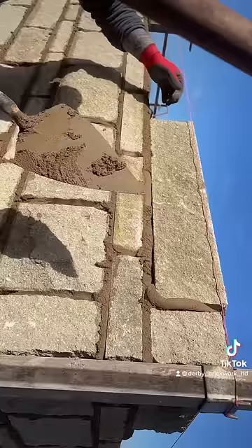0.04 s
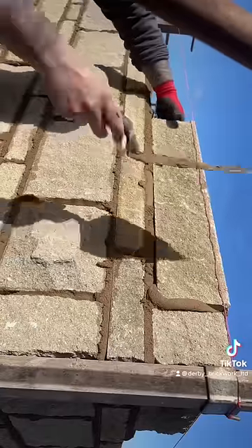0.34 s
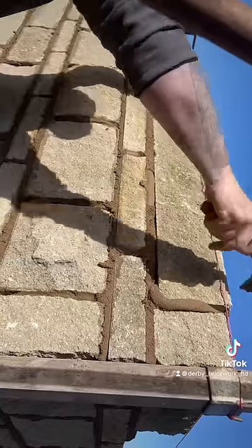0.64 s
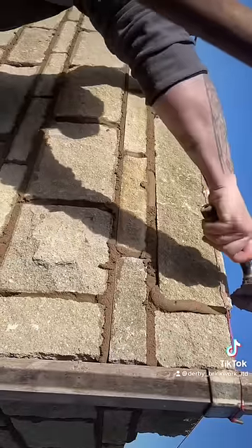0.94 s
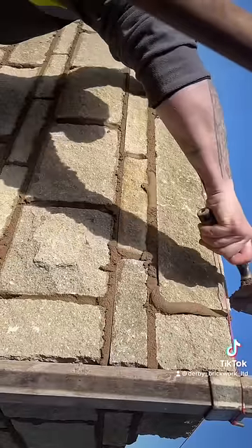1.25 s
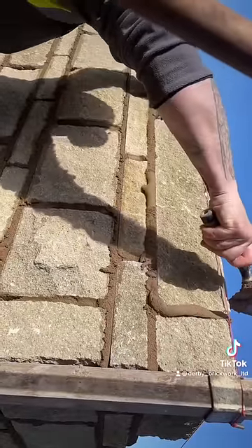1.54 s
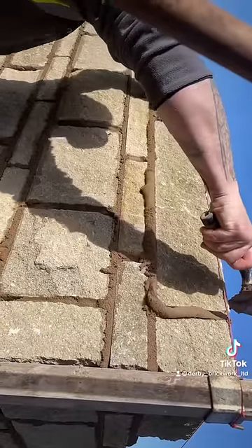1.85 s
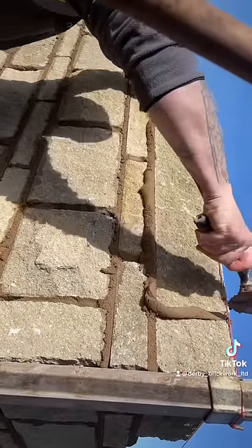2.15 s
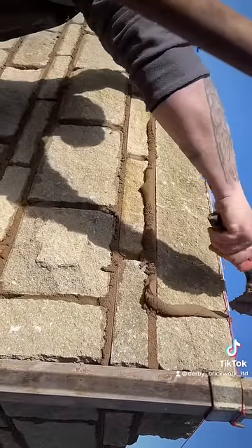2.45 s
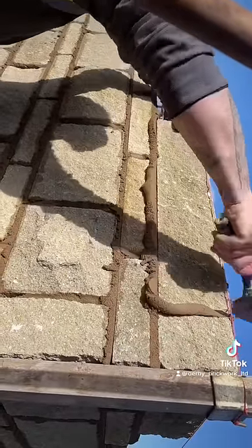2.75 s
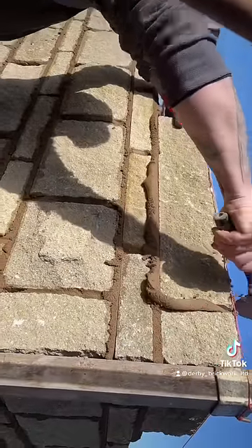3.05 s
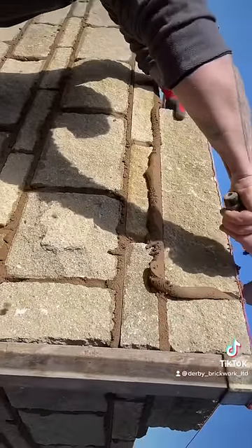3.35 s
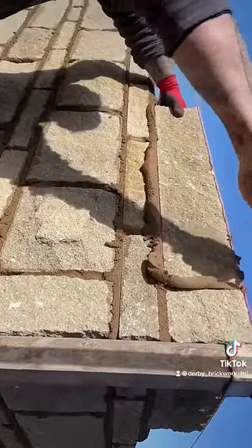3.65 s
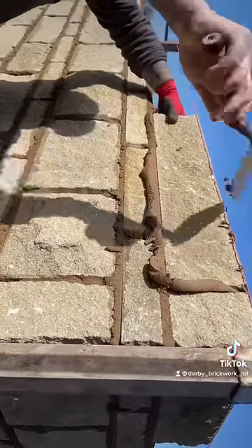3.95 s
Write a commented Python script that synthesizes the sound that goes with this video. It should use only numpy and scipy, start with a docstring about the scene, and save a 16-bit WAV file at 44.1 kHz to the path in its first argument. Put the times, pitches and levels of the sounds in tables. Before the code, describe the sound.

Outdoors by a wall, a trowel gives stone one light tap. Faint mortar ticks follow, then three sharp ringing knocks and a brief sandy rasp. Wind rumbles on the microphone throughout, above a faraway traffic hum.

```python
"""Outdoors by a wall and scaffold, a mason taps a stone block with a steel trowel, once lightly and three
times hard: grit crunches, the blade rings, the block knocks. He scrapes mortar off its edge, the steel
rasping over sand. Crumbs tick, wet mortar rubs softly, and the wall and scaffold answer closely.
Wind buffets the microphone over the hum of distant traffic, with a faint far whistle and whine,
and a thin hiss on top."""
import sys
import numpy as np
from scipy import signal
from scipy.fft import rfft, irfft, next_fast_len
from scipy.io import wavfile
from scipy.ndimage import uniform_filter1d, minimum_filter1d, map_coordinates

SR = 44100
rng = np.random.default_rng(int(sys.argv[2]) if len(sys.argv) > 2 else 0)


def master_out(mix):
    """Clip the mix to full scale and print it as 16-bit PCM to the path in sys.argv[1]."""
    frames = np.transpose(np.atleast_2d(mix))
    ceiling = np.clip(frames, -1, 1)
    pcm = np.round(ceiling * 32767).astype(np.int16)
    wavfile.write(sys.argv[1], SR, pcm)


N = 176400

# The blade's broad resonances on contact. Each row: centre in Hz, width in Hz, level in dB.
STRUCK_STEEL = [(1770, 170, 0.5), (2150, 380, 2), (3120, 200, 0), (3650, 220, -3.5), (4300, 250, -4.5),
                (4990, 320, 0.5), (6030, 310, 4), (7200, 300, -3), (8050, 230, -8.5), (9100, 400, -9.5),
                (10660, 440, -11), (11800, 440, -5), (13100, 600, -9.5), (15140, 1500, -6.5)]


def trowel_taps():
    """Steel hits stone: a crack, a crunch of grit, ringing blade and block, and a dead thud."""
    # The blows. Each row: start in seconds; levels in dB of crack, blade ring, flex, clack, stone and
    # crunch; crunch hold in seconds; brightness of the crack in dB per octave.
    blows = [(0.717, -27, -40, -17.5, -25, -28, -30, 0.0038, -2),
             (2.6557, -15.5, -25, -15, -17.5, -9, -14.5, 0.0045, 1),
             (2.9785, -13.5, -11, -21, -20, -8, -11, 0.0075, -.5),
             (3.286, -14.5, -9.5, -7, -14, -21.5, -14, .011, 0)]
    # The blade's upper ring, the trowel's short clack and the block's note.
    # Each row: pitch in Hz, level in dB, time to fall 60 dB in seconds.
    blade_modes = [(1453, 1, .16), (1550, -13, .08), (1660, -11, .08), (1975, -10, .06), (2155, -7, .06),
                   (2260, -9, .06), (3145, -8, .04), (3660, -11, .045), (4950, -10, .04), (5100, -10, .045),
                   (6010, -7, .035), (6135, -7, .035), (7075, -12, .045), (8150, -11, .035),
                   (11800, -11, .03)]
    clack_modes = [(1090, -6, .07), (1180, -4, .03), (1248, 0, .04), (1340, -6, .04), (1600, -3, .07),
                   (1780, -3, .04), (1895, -7, .06)]
    stone_modes = [(660, -11, .045), (740, -7, .05), (818, 1, .07), (860, -7, .05), (940, -7, .04),
                   (980, -3, .09)]
    # Tone of the crunch and of the thud. Each row: frequency in Hz, level in dB.
    crunch_colour = [(200, 15), (480, 3), (650, 17.5), (1000, 4), (1250, 3), (2200, 4.5), (2800, -3.5),
                     (4400, -5.5), (8000, -24), (15800, -31)]
    thud_colour = [(300, -40), (540, -20), (640, 0), (850, 2), (1020, -2), (1130, -18), (2000, -40)]
    flex_hz, flex_t60, tilt_pivot_hz = 641, .09, 5000
    rings, crack, crunch, thud = np.zeros((4, N))
    for start, crack_db, blade_db, flex_db, clack_db, stone_db, crunch_db, crunch_s, tilt_db in blows:
        blade = amp(blade_db) * ring(blade_modes)
        clack = amp(clack_db) * ring(clack_modes)
        flex = ring([(flex_hz, flex_db, flex_t60)])
        add(rings, start, blade + clack + flex)
        block_start = start + .0015  # the block answers just after the crack
        add(rings, block_start, amp(stone_db) * ring(stone_modes))
        thud += amp(stone_db - 2.5) * burst(block_start, t60=.028, hold=.007)
        crush = amp(crunch_db) * burst(start, t60=.04, hold=crunch_s)
        crunch += crush
        impact = amp(crack_db) * burst(start, t60=.008, hold=.0015)
        force = (impact + amp(-10) * crush) * rng.standard_normal(N)  # crushed grit shakes the steel too
        crack += filtered(force, lambda hz: amp(tilt_db * np.log2((hz + 1) / tilt_pivot_hz)))
    steel_crack = through_steel(crack, STRUCK_STEEL)
    return rings + steel_crack + crunch * noise(crunch_colour) + thud * noise(thud_colour)


def trowel_scrape():
    """The blade lands, drags over sand grains that hiss and excite the steel, then lifts and rings on."""
    # The shape of the stroke. Each row: time in seconds, level in dB.
    stroke_levels = [(3.679, -61), (3.683, -31), (3.70, -24), (3.72, -28), (3.738, -21), (3.747, -25),
                     (3.756, -23), (3.80, -25), (3.87, -22), (3.892, -26.5), (3.905, -45), (3.94, -70)]
    # The blade lands flat, then catches on coarse sand.
    # Each row: start in seconds, level in dB, time to fall 60 dB in seconds.
    snags = [(3.6805, -16.5, 0.1), (3.745, -16.5, 0.023), (3.756, -22, 0.02), (3.821, -18, 0.011),
             (3.8903, -24, 0.024)]
    # Tone of the sliding grit and of the catches. Each row: frequency in Hz, level in dB.
    grit_colour = [(470, -9.5), (800, 0.5), (989, -9), (1160, -2), (1320, -8.5), (1420, 1.5), (2280, -15),
                   (2650, -8.5), (3360, -3), (3860, -7), (6510, -8), (7600, -12.5), (8790, -19.5),
                   (10700, -14.5), (12300, -12), (15800, -30)]
    catch_colour = [(600, -14), (1500, -2.5), (2250, 12), (2900, -2), (4200, 2), (7000, -12), (15000, -49)]
    # Resonances of the pressed blade. Each row: centre in Hz, width in Hz, level in dB.
    pressed_steel = [(1800, 56, 3.5), (2020, 15, 7), (2225, 170, 1), (2840, 20, -13), (3190, 200, -2),
                     (3400, 120, -12.5), (5570, 67, -7), (5780, 82, -1.5), (7100, 360, -6),
                     (11770, 450, -13)]
    grains_per_s, spread_db, chatter_db = 1300, 1, 2
    lift_s, free_hz, free_db, free_t60 = 3.893, 6130, -42, .18
    grains = (rng.random(N) < grains_per_s / SR) * np.sign(rng.standard_normal(N))
    grains *= amp(spread_db * rng.standard_normal(N))
    grains *= amp(chatter_db * wobble(170))
    stroke = amp(curve(stroke_levels, outside=-120))
    drag = stroke * unit(patchy(grains, depth_db=3))
    grit = amp(-4) * filtered(drag, lambda hz: unit(amp(along(grit_colour, hz))))
    steel = amp(-6.5) * through_steel(drag, pressed_steel)
    catches = noise(catch_colour) * sum(amp(db) * burst(start, t60) for start, db, t60 in snags)
    out = grit + steel + catches
    add(out, lift_s, ring([(free_hz, free_db, free_t60)]))
    return out + edge_squeal()


def edge_squeal():
    """The edge sticks and slips in a rough squeal that rises through the stroke."""
    # The squeal's path. Each row: time in seconds, pitch in Hz, level in dB.
    path = [(3.732, 3200, -48), (3.777, 3280, -25.5), (3.798, 3430, -25.5), (3.828, 3580, -34),
            (3.88, 3630, -35)]
    times, hz, db = np.transpose(path)
    pitch = np.interp(clock(), times, hz) * (1 + .025 * wobble(700))
    level_db = np.interp(clock(), times, db, -120, -120) + 3 * wobble(180)
    return amp(level_db) * sine(pitch)


def mortar_crumbs():
    """Crumbs and small touches of the blade make soft-edged ticks, partly coloured by the steel."""
    # The ticks. Each row: start in seconds, level in dB.
    touches = [(0.047, -35.5), (0.4433, -42.5), (0.784, -37.5), (1.192, -33.5), (1.218, -38.5),
               (1.3723, -44), (1.4104, -43.5), (1.4575, -41.5), (2.828, -29), (2.8826, -37.5),
               (2.9012, -40), (2.9206, -33)]
    # Their bright tone. Each row: frequency in Hz, level in dB.
    colour = [(1500, -19), (3500, 1), (6800, 3.5), (9500, -8), (12300, -6), (15500, -16)]
    ticks = sum(amp(db - 8) * burst(start, t60=.03) * fade_in(start, seconds=.002)
                for start, db in touches)
    mortar = patchy(noise(colour) * ticks, depth_db=5)  # each crumb has its own colour
    return mortar + amp(-5) * through_steel(ticks * rng.standard_normal(N), STRUCK_STEEL)


def mortar_rubs():
    """Soft swells of friction as the blade presses wet mortar home."""
    # The rubs. Each row: centre in seconds, half length in seconds, level in dB.
    rubs = [(0.46, 0.015, -47), (2.04, 0.072, -48.5), (2.188, 0.068, -52), (2.425, 0.054, -53),
            (2.558, 0.019, -55), (2.884, 0.051, -53)]
    # Their midrange tone. Each row: frequency in Hz, level in dB.
    colour = [(700, -15), (1200, 11), (1600, -1), (2100, 0), (2800, -5), (3600, 0), (4400, -9.5),
              (6500, -17), (9000, -34), (14000, -32)]
    swells = sum(amp(db) * np.exp(-.5 * ((clock() - centre) / half) ** 2) for centre, half, db in rubs)
    return noise(colour) * swells


def yard_echoes(x):
    """Dull slaps off wall and scaffold, and a short outdoor tail."""
    # The slaps. Each row: delay in seconds, level in dB.
    slaps = [(.0107, -14), (.0262, -18)]
    # The tail's decay. Each row: frequency in Hz, time to fall 60 dB in seconds.
    decay = [(300, .2), (1500, .16), (6000, .12), (14000, .08)]
    dull_above_hz = 4000

    def walls(hz):
        delays = sum(amp(db) * np.exp(-2j * np.pi * hz * delay) for delay, db in slaps)
        return delays / (1 + 1j * hz / dull_above_hz) ** 2

    hz, t, bands = signal.stft(rng.standard_normal(SR // 3), SR, nperseg=256)
    tail = signal.istft(bands * amp(-60 * t / along(decay, hz)[:, None]), SR, nperseg=256)[1]
    return filtered(x, walls) + amp(-18) * signal.fftconvolve(x, tail / np.linalg.norm(tail))[:N]


def wind():
    """Wind on the microphone: a fluttering rumble, each gust adding a buffet and a harsher flap."""
    # The wind's strength. Each row: time in seconds, level in dB.
    levels = [(0.0, -22), (0.03, -25), (0.1, -19), (1.25, -26.5), (1.77, -19), (1.82, -24.5), (2.05, -18.5),
              (2.08, -25.5), (2.34, -16.5), (2.36, -25), (2.81, -20), (2.85, -15), (3.13, -27.5),
              (3.19, -18.5), (3.68, -18.5), (3.7, -17.5), (3.98, -15.5), (4.0, -17)]
    # The gusts. Each row: start in seconds, length in seconds, level in dB, flap in dB against the gust.
    gusts = [(0.087, 0.012, -18, -32), (0.201, 0.0064, -13.5, -20), (0.235, 0.0067, -32.5, -3),
             (0.305, 0.038, -14.5, -6), (0.38, 0.01, -12, -17.5), (0.426, 0.13, -26, -19.5),
             (0.575, 0.035, -19.5, -19.5), (0.722, 0.035, -27, -36), (1.576, 0.036, -22.5, -22),
             (1.85, 0.041, -24.5, -26), (1.995, 0.039, -19, -16.5), (2.28, 0.022, -16.5, -12),
             (2.473, 0.012, -25, -14), (2.839, 0.072, -18, -10), (3.193, 0.027, -17.5, -14.5),
             (3.316, 0.13, -23.5, -22), (3.459, 0.038, -15.5, -14.5), (3.553, 0.067, -27.5, -4.5),
             (3.658, 0.071, -18.5, -7), (3.758, 0.14, -18.5, -6), (3.918, 0.056, -10.5, -4)]
    # Tone of the three layers, lowest first. Each row: frequency in Hz, level in dB.
    rumble_colour = [(10, -59.5), (24, -33), (31, -21.5), (42, -5.5), (62, 4.5), (100, 2.5), (150, -5.5),
                     (250, -17), (400, -45), (800, -76)]
    buffet_colour = [(15, -55), (50, -17.5), (110, 2.5), (190, -1), (300, -7), (450, -18), (800, -37.5),
                     (1600, -84)]
    flap_colour = [(30, -52), (150, -22.5), (330, 8), (480, -3.5), (750, -12), (1300, -24.5), (2500, -45.5),
                   (5000, -77)]
    lull_db, release_s = -14, .015
    strength = amp(curve(levels))
    buffet = strength * amp(lull_db + 5 * wobble(22.22))
    flap = np.zeros(N)
    for start, length, db, flap_db in gusts:
        release = np.exp(-np.clip((clock() - start - length) / release_s, 0, 20))
        swell = amp(db) * fade_in(start, seconds=.0035) * release
        buffet = np.hypot(buffet, swell)
        flap += amp(flap_db) * swell
    rumble = strength * amp(.5 + 2.5 * wobble(14)) * eddies(rumble_colour)
    return rumble + buffet * eddies(buffet_colour) + flap * amp(4.5 * wobble(120)) * eddies(flap_colour)


def traffic():
    """Distant traffic blurs into a gently swaying hum."""
    # The hum's slow drift. Each row: time in seconds, level in dB.
    levels = [(0.0, -46.5), (0.65, -47), (0.99, -49), (1.7, -49), (2.17, -49.5), (2.73, -47), (3.65, -49)]
    # Its dull tone. Each row: frequency in Hz, level in dB.
    colour = [(240, -12.5), (400, -7), (620, -0.5), (860, -2), (1020, -13.5), (1220, -9.5), (1550, -11.5),
              (2200, -12), (2870, -22), (3450, -18.5), (3900, -22), (5400, -25), (6600, -29.5), (8500, -42),
              (10500, -55.5), (15800, -68)]
    return amp(curve(levels) + 4.5 + .5 * wobble(7.56)) * noise(colour)


def far_tones():
    """A thin falling whistle and, later, a wavering whine."""
    # Each row: start and end in seconds, first and last pitch in Hz, level in dB, waver as a pitch share.
    glides = [(0.048, 0.19, 4870, 4700, -61, 0.006), (1.993, 2.62, 3515, 3610, -60.5, 0.022)]
    out = np.zeros(N)
    for start, end, from_hz, to_hz, db, waver in glides:
        progress = fade_in(start, end - start)
        pitch = (from_hz + (to_hz - from_hz) * progress) * (1 + waver * wobble(150))
        arch = np.sqrt(2 * np.abs(np.sin(np.pi * progress)))
        out += amp(db + 2 * wobble(60)) * arch * sine(pitch)
    return out


def top_hiss():
    """A thin, high hiss that swells and sinks."""
    # The swells. Each row: time in seconds, level in dB.
    levels = [(0, -70), (.5, -67.5), (.9, -74.5), (1.4, -67), (1.75, -73), (2.05, -65.5), (2.4, -72.5),
              (2.6, -80), (2.87, -60.5), (3.2, -73), (4, -69)]
    # The airy tone. Each row: frequency in Hz, level in dB.
    colour = [(3000, -12), (7000, 2), (9000, 0), (10500, -5), (11500, -2), (12200, 2), (12900, 0),
              (13700, -5), (15800, -5)]
    return amp(curve(levels)) * noise(colour)


def ring(modes, attack_s=.0007):
    """Damped modes that start together, their levels scattered by about 1 dB at each blow."""
    t = np.arange(SR // 3) / SR
    tones = sum(amp(db + rng.normal() - 60 * t / t60) * np.sin(2 * np.pi * hz * t)
                for hz, db, t60 in modes)
    return tones * (1 - np.exp(-t / attack_s))


def through_steel(x, resonances):
    """x excites the blade's resonances, a bank of band-passes with unit power overall."""
    def response(hz):
        bank = sum(amp(db) * 1j * hz * width / (centre ** 2 - hz ** 2 + 1j * hz * width)
                   for centre, width, db in resonances)
        return bank / np.sqrt(np.mean(np.abs(bank) ** 2))

    return filtered(x, response)


def patchy(x, depth_db):
    """Gains that wander in small patches of time and pitch, as the contact shifts."""
    bands = signal.stft(x, nperseg=512)[2]
    patches = uniform_filter1d(rng.standard_normal(bands.shape), size=6, axis=0)
    patches = uniform_filter1d(patches, size=3, axis=1)
    return signal.istft(bands * amp(depth_db * unit(patches)), nperseg=512)[1][:N]


def eddies(colour):
    """Noise with its slow swells evened out, so that the gusts set its level."""
    x = noise(colour)
    power = np.abs(uniform_filter1d(x * x, size=1300))
    return unit(x / np.sqrt(power + .012))


def noise(colour):
    """Coloured noise of rms 1."""
    return unit(filtered(rng.standard_normal(N), lambda hz: amp(along(colour, hz))))


def filtered(x, response):
    """x shaped by a complex response of frequency."""
    size = next_fast_len(N + SR // 2)
    return irfft(rfft(x, size) * response(np.fft.rfftfreq(size, 1 / SR)), size)[:N]


def burst(start, t60, hold=0):
    """An envelope that snaps open, holds, then falls 60 dB in t60 seconds."""
    t = clock() - start
    return (t >= 0) * amp(-60 * np.clip((t - hold) / t60, 0, 10))


def fade_in(start, seconds):
    return np.clip((clock() - start) / seconds, 0, 1)


def wobble(rate):
    """A smooth random curve, rate knots a second."""
    return map_coordinates(rng.standard_normal(int(N * rate / SR) + 4), [clock() * rate])


def curve(points, outside=None):
    """Joins (seconds, value) points, one value per sample."""
    return np.interp(clock(), *np.transpose(points), outside, outside)


def along(points, hz):
    """Joins (Hz, value) points on a log axis."""
    knots_hz, values = np.transpose(points)
    return np.interp(np.log(hz + 1), np.log(knots_hz + 1), values)


def sine(hz):
    return np.sin(2 * np.pi * np.cumsum(hz) / SR)


def add(track, start, sound):
    i = round(start * SR)
    track[i:i + len(sound)] += sound[:N - i]


def amp(db):
    return 10 ** (np.asarray(db) / 20)


def unit(x):
    return x / np.sqrt(np.mean(x ** 2) + 1e-20)


def clock():
    return np.arange(N) / SR


def scene():
    """The trowel and its echoes, over wind, far sounds and hiss, in mono."""
    trowel = trowel_taps() + trowel_scrape() + mortar_crumbs() + mortar_rubs()
    hiss = top_hiss()
    return (trowel + yard_echoes(trowel) + wind() + traffic() + far_tones() + hiss)[None]


def record(dry):
    """A fast limiter holds down the peaks, then a steep low-pass trims the very top."""
    ceiling, hold_samples = .9, int(.0012 * SR)
    top_hz, edge_hz = 15740, 110
    x = dry[0]
    gain = ceiling / np.maximum(np.abs(x), ceiling)
    gain = uniform_filter1d(minimum_filter1d(gain, hold_samples), hold_samples)
    return filtered(x * gain, lambda hz: .5 - .5 * np.tanh((hz - top_hz) / edge_hz))[None]


dry = scene()
out = record(dry)
master_out(out)
```